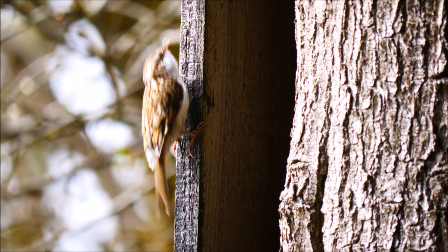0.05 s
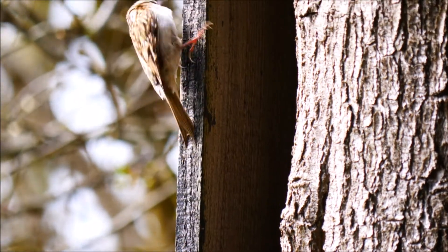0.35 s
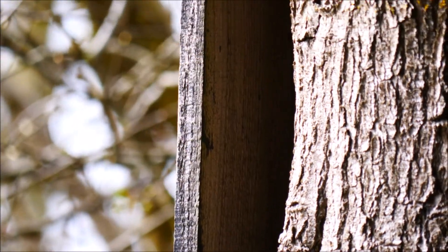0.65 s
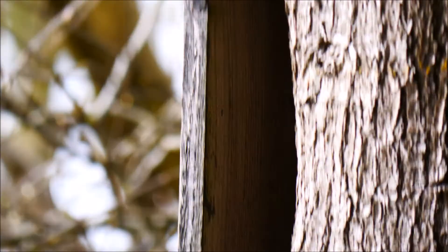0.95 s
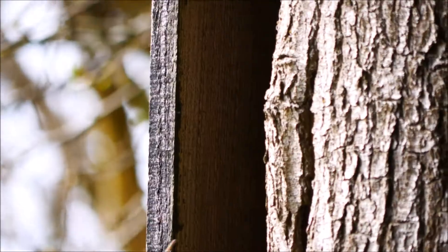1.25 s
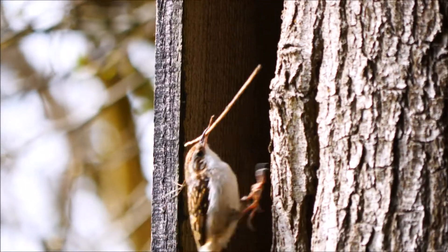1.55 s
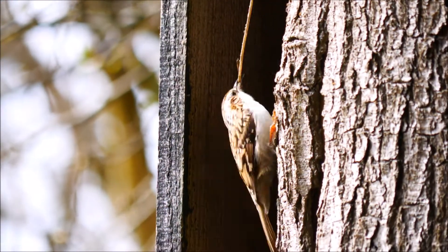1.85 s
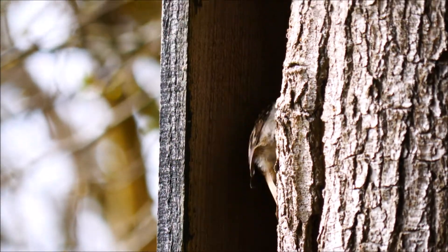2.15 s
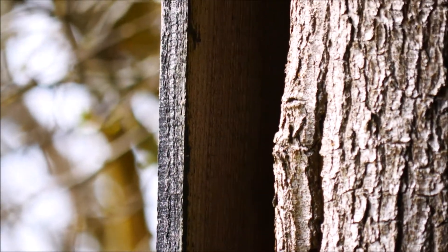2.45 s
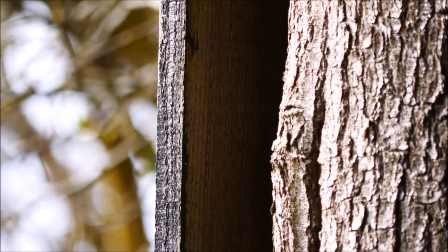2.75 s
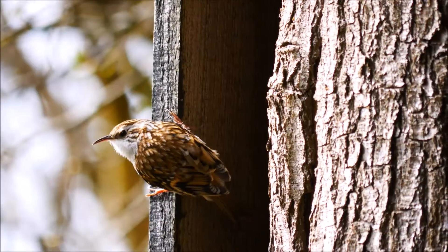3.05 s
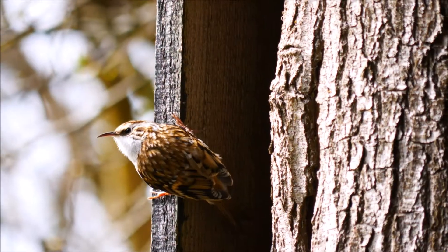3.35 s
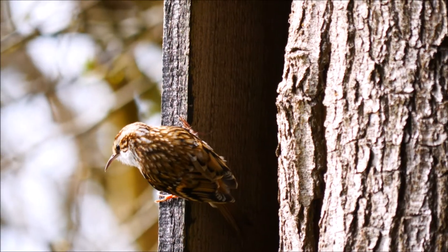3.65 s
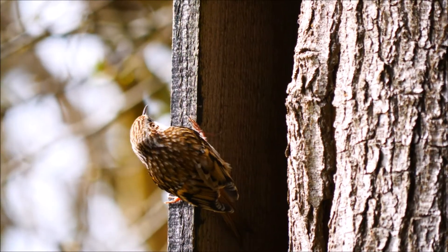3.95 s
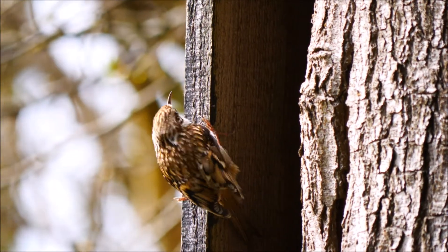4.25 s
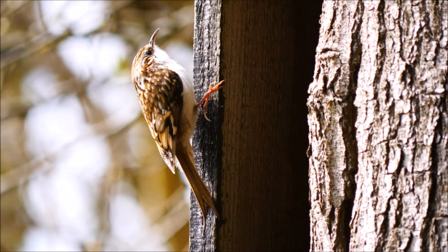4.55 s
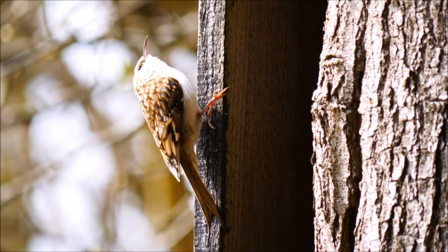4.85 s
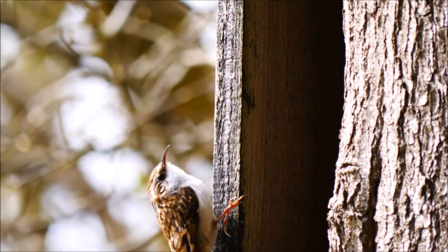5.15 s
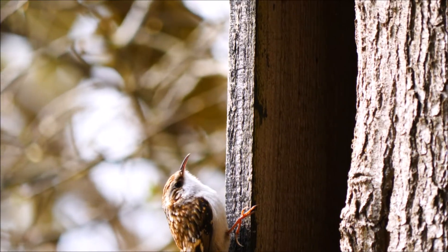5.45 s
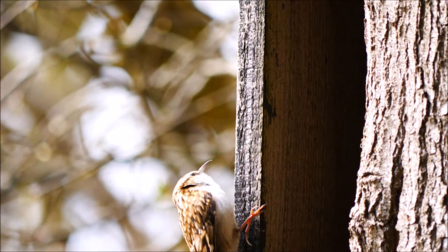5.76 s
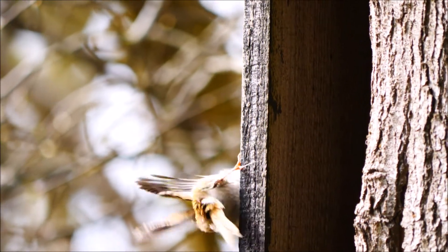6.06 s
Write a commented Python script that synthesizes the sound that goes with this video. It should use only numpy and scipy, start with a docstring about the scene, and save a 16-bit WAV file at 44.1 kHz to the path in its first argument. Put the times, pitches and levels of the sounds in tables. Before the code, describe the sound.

Thin chirps, hoarse whistling calls and light ticks on tree bark over a low, far road roar that cuts out briefly twice.

```python
"""A woodland edge by a barn: distant engines rumble and tyres roar and hum under a thin hiss of leaves.
From the start far birds sing, smeared by the echo of the wood; a near one brushes its feathers on bark.
Hoarse calls, a high pip, a tick of claws and a falling swish lead into a brief dropout at 1.1 s.
Chirps and sharper ticks follow, then a second dropout at 2.9 s; each time the traffic returns changed.
Last come two-tone calls and the loudest hoarse calls, as the rumble swells a little."""
import sys
import numpy as np
from scipy import signal
from scipy.fft import rfft, irfft, next_fast_len
from scipy.io import wavfile
from scipy.ndimage import uniform_filter1d, map_coordinates

SR = 44100
rng = np.random.default_rng(int(sys.argv[2]) if len(sys.argv) > 2 else 0)


def bounce(signal):
    """Save signal as a 16-bit WAV file at the path given by the first command-line argument."""
    frames = np.transpose(np.atleast_2d(signal))
    limited = np.clip(frames, -1, 1)
    pcm = np.round(limited * 32767).astype(np.int16)
    wavfile.write(sys.argv[1], SR, pcm)


N = 278271
TIME = np.arange(N) / SR
LONG_T60, SHORT_T60 = 0.55, 0.48  # how long the wood rings after a call [s]


def amp(db):
    """Decibels to gain."""
    return 10 ** (np.asarray(db) / 20)


def unit(x):
    """Scale to rms 1."""
    return x / np.sqrt(np.mean(x ** 2) + 1e-20)


def along(points, hz):
    """Read (frequency, value) points on a log axis."""
    f, v = np.transpose(points)
    return np.interp(np.log(hz + 1), np.log(f + 1), v)


def arch(t, length):
    """A smooth rise and fall that lasts length seconds."""
    return np.sin(np.pi * np.clip(t / length, 0, 1))


def wobble(rate):
    """A smooth random curve, rate knots a second."""
    return map_coordinates(rng.standard_normal(256), [TIME * rate], mode="mirror")


def filtered(x, response):
    """EQ x with a gain given as a function of frequency."""
    n = x.shape[-1]
    m = next_fast_len(n + 8192)
    return irfft(rfft(x, m) * response(np.fft.rfftfreq(m, 1 / SR)), m)[..., :n]


def add(out, start, x):
    """Mix a stereo sound in at start seconds."""
    part = out[:, max(round(start * SR), 0):][:, :x.shape[-1]]
    part += x[..., :part.shape[-1]]


# stereo image of the noise beds: (frequency [Hz], left-right correlation [0 to 1])
STEREO_IMAGE = [(25, .85), (45, 0.67), (70, 0.99), (130, 1), (250, 1), (500, 0.98), (1000, 0.87),
                (2000, 0.66), (4000, 0.5), (8000, 0.52), (12000, .45)]


def noise_bed(spectrum, patchy_db):
    """Stereo noise of rms 1 with fleeting narrow patches, near mono in the bass, wider in the treble."""
    bins = signal.stft(rng.standard_normal((2, N)), nperseg=2048)[2]
    patches = uniform_filter1d(rng.standard_normal(bins.shape[1:]), size=4, axis=0)
    patches = unit(uniform_filter1d(patches, size=3, axis=1))
    pair = signal.istft(bins * amp(patchy_db * patches), nperseg=2048)[1][:, :N]
    width = lambda hz: np.arccos(np.clip(along(STEREO_IMAGE, hz), 0, 1)) / 2
    eq = lambda hz: amp(along(spectrum, hz)) * [np.cos(width(hz)), np.sin(width(hz))]
    mid, side = filtered(pair, eq)
    return unit(np.array([mid + side, mid - side]))


# background mix before, between and after the dropouts: (rumble [dB], roar [dB], roar swell [dB/s],
# roar tilt about 1 kHz [dB], tilt drift [dB/s], bass EQ [dB], low-mid EQ [dB],
# leaves [dB], leaf swell [dB/s])
BED_MIX = [(-42, -38, -1.3, -1, -1.3, -4, 0, -57, 0), (-43.5, -40, 1.1, 0, -0.3, -1, -3, -57.5, 0),
           (-44, -42, 0.73, -1, -0.24, -1, -0.2, -58.5, -0.45)]


def bed_mix():
    """Per sample: the seconds since this stretch of background began, then each of its settings."""
    starts = np.array([0] + [row[1] for row in CUTS])
    index = np.searchsorted(starts[1:], TIME, side="right")
    return [TIME - starts[index], *np.array(BED_MIX)[index].T]


# tone of the engine rumble and of the tyre roar: (frequency [Hz], relative level [dB])
ENGINE_EQ = [(20, -32.5), (45, -28), (65, -20.5), (100, -6.5), (135, -0.5), (175, 1.5), (305, -1.1),
             (400, -7.5), (600, -11.5), (1200, -46)]
TYRE_EQ = [(200, -59), (400, -9), (560, -8), (660, -4.5), (770, -2), (1000, -3.5), (1250, -7.5),
           (1600, -10.5), (2100, -20), (2800, -27.5), (5000, -57), (16000, -71)]
# brief swells and dips in the level of the rumble and roar:
# (time [s], length [s], rumble change [dB], roar change [dB])
TRAFFIC_SWELLS = [(0.606, 0.32, -1, -0.1), (1.5, 0.4, 0.3, 0.5), (4.248, 1.1, 1.5, 0.5), (5.2, 1, 2, 0)]


def traffic(drift_db=-0.9, throb_db=-0.5, left_db=0.12, low_mid_hz=515, low_mid_width_hz=100):
    """Engines rumble far away; the tyre roar swells or ebbs and changes colour as vehicles move."""
    age, rumble_db, roar_db, swell_db, tilt_db, tilt_drift, bass_db, low_mid_db, *_ = bed_mix()
    for start, length, rumble_change_db, roar_change_db in TRAFFIC_SWELLS:
        envelope = arch(TIME - start, length)
        rumble_db = rumble_db + rumble_change_db * envelope
        roar_db = roar_db + roar_change_db * envelope
    tilt_db = tilt_db + tilt_drift * age
    roar = noise_bed(TYRE_EQ, patchy_db=0.97)
    dark = filtered(roar, lambda hz: 1 / (1 + (hz / 1000) ** 4))
    roar = dark * amp(-tilt_db / 2) + (roar - dark) * amp(tilt_db / 2)
    rumble = noise_bed(ENGINE_EQ, patchy_db=1.76)
    bass = filtered(rumble, lambda hz: 1 / (1 + (hz / 120) ** 4))
    engines = amp(rumble_db + throb_db * wobble(4.3)) * (rumble + (amp(bass_db) - 1) * bass)
    road = engines + amp(roar_db + swell_db * age + drift_db * wobble(4.04)) * roar
    low_mids = filtered(road, lambda hz: np.exp(-((hz - low_mid_hz) / low_mid_width_hz) ** 2))
    return (road + (amp(low_mid_db) - 1) * low_mids) * amp([[left_db], [-left_db]])


# tyres singing above the roar: (time [s], length [s], start pitch [Hz], drift [Hz/s], level [dB])
TREAD_HUMS = [(-.2, 1.6, 1206, -10, -49), (0.407, 1.1, 751, -16.5, -53), (0.601, 0.7, 1805, -31.5, -58),
              (1.5, 0.73, 1395, 0, -52), (1.7, 0.6, 864, -51.5, -45.5), (2.204, .6, 745, -10.5, -52.5),
              (2.204, 0.92, 1094, -10, -53.5), (3.3, 2.2, 814, -20.5, -57.5), (5.2, 1.7, 810, -34.5, -48),
              (5.3, 0.8, 902, 0, -51)]


def tread_hum(width_hz=72):
    """Each vehicle's tread sings a narrow band of noise that swells and fades; most sink in pitch."""
    out = np.zeros((2, N))
    band = [(0, 0), (width_hz / 3, 0), (width_hz, -15), (4 * width_hz, -80)]
    to_stereo = np.array([[1, .3], [1, -.3]])
    for start, length, hz, drift, db in TREAD_HUMS:
        phase = 2 * np.pi * np.cumsum(hz + drift * (TIME - start)) / SR
        a, b = filtered(rng.standard_normal((2, 2, N)), lambda f: amp(along(band, f)))
        hum = a * np.cos(phase) + b * np.sin(phase)  # slow noise shifted up to the pitch
        out += amp(db) * arch(TIME - start, length) * unit(to_stereo @ hum)
    return out


# tone of the moving air: (frequency [Hz], relative level [dB])
DRAUGHT_EQ = [(15, -7), (45, -1), (90, -12.5), (200, -36), (600, -75.5)]


def draught(db=-83):
    """A trace of moving air at each microphone port, unrelated from left to right."""
    air = filtered(rng.standard_normal((2, N)), lambda hz: amp(along(DRAUGHT_EQ, hz)))
    return amp(db) * unit(air)


# tone of the leaf hiss: (frequency [Hz], relative level [dB])
LEAF_EQ = [(800, -23.5), (2000, 0), (3000, 2), (4400, -2.5), (5500, -8), (7500, -11), (9500, -12),
           (12500, -18.5), (15000, -27.5)]


def leaves(waver_db=1.5):
    """A thin, wavering hiss of air in the trees, easing in the last stretch."""
    age, *_, hiss_db, swell_db = bed_mix()
    return amp(hiss_db + swell_db * age + waver_db * wobble(7)) * noise_bed(LEAF_EQ, patchy_db=2.5)


def woods(x, wet_db, t60, side_db):
    """A short sound and its scatter from many trunks, new for every perch."""
    t = np.arange(SR // 2) / SR
    tails = rng.standard_normal((2, len(t))) * amp(-60 * t / t60)
    tails *= amp(wet_db) / np.linalg.norm(tails[0])
    tails[0, 0] += 1  # the direct path
    mid, side = signal.fftconvolve(x[None], tails, axes=1)
    return np.array([mid + amp(side_db) * side, mid - amp(side_db) * side])


def bird_note(length, start_hz, glide, flutter, wet_db, t60=LONG_T60, warble=0, octave_db=-60, fade=.47):
    """A whistle with a weak octave and its echo; glide, flutter and warble are shares of the pitch."""
    flutter_rate, warble_rate = 330, 21  # per second
    t = np.arange(SR // 5) / SR
    progress = np.clip(t / length, 0, 1)
    shake = map_coordinates(rng.standard_normal(128), [t * flutter_rate], mode="mirror")
    vibrato = warble * np.cos(2 * np.pi * warble_rate * t)
    hz = start_hz * (1 + glide * progress) * (1 + flutter * shake + vibrato)
    envelope = np.sin(np.pi / 2 * np.clip(2 * np.minimum(progress, 1 - progress) / fade, 0, 1))
    phase = 2 * np.pi * np.cumsum(hz) / SR
    tone = np.sin(phase) + amp(octave_db) * np.sin(2 * phase)
    sound = woods(envelope * tone, wet_db, t60, side_db=-7.0)
    return sound * np.sqrt(2 * length * SR / np.sum(sound ** 2))


# phrases of far song: (time [s], length [s], pitch [Hz], level [dB])
PHRASES = [(0.023, 0.56, 4300, -65.5), (0.55, 0.5, 4190, -73), (1.846, 1.24, 4770, -63),
           (3.156, 0.61, 4780, -63.5), (4.797, 0.6, 4600, -68), (5.546, 0.36, 4120, -63)]
# tone of the blur of still farther birds: (frequency [Hz], relative level [dB])
TWITTER_EQ = [(2000, -43.5), (3000, -2.5), (3900, 4.5), (4700, -5), (5100, -6.5), (5600, -33.5),
              (7500, -48)]


def far_song(count=8, note_s=.05, note_db=-3, pitch_spread=.04, glide_spread=.05, floor_db=-76.5):
    """Each phrase is a run of quick random notes over a soft band of twitter that swells with it."""
    out = np.zeros((2, N))
    twitter_gain = amp(floor_db)
    for start, length, hz, db in PHRASES:
        twitter_gain = np.hypot(twitter_gain, amp(db) * arch(TIME - start, length))
        for k, (detune, glide) in enumerate(rng.standard_normal((count, 2))):
            note_hz = hz * (1 + pitch_spread * detune)
            note = bird_note(note_s, note_hz, glide_spread * glide, flutter=.025, wet_db=11.5)
            add(out, start + length * k / count, amp(db + note_db) * note)
    return out + twitter_gain * noise_bed(TWITTER_EQ, patchy_db=4.0)


# strokes of feathers on bark: (time [s], length [s], level [dB])
FEATHER_STROKES = [(.05, 0.49, -71.5), (1.593, 0.23, -72.5), (2.142, .1, -69.5), (2.265, 0.31, -59),
                   (2.48, 0.63, -73), (6.069, .08, -63.5)]
# their airy tone: (frequency [Hz], relative level [dB])
FEATHER_EQ = [(3000, 0.5), (6000, -1), (8000, -2.5), (9500, 0.5), (12300, 2.5), (13500, -7.5), (15500, -12)]


def feathers(floor_db=-86, grain_db=1.2):
    """The soft brush of feathers in a crevice; each stroke swells and fades."""
    strokes = sum(amp(db) * arch(TIME - start, length) for start, length, db in FEATHER_STROKES)
    brush = noise_bed(FEATHER_EQ, patchy_db=1.8)
    return (amp(floor_db) + strokes) * amp(grain_db * wobble(38)) * brush


# rasps that end in a whistle:
# (time [s], length [s], rasp pitch [ratio], rasp level [dB], whistle pitch [Hz], whistle level [dB])
RASPS = [(0.057, 0.11, 1, -62, 4550, -70), (0.367, 0.086, 0.99, -61, 4850, -64),
         (0.964, 0.085, 1.1, -64, 4740, -73), (4.829, 0.099, 1.05, -53.5, 4450, -45),
         (5.088, 0.086, 1.02, -54, 4260, -47)]


def hoarse_calls(high_hz=6400, low_hz=3800, low_db=2.5, octaves=0.29, ceiling_hz=9000, rise=0.064):
    """Noise swells through two broad, climbing resonances, then a warbling whistle falls slightly."""
    whistle_delay_s = .053
    out = np.zeros((2, N))
    t = np.arange(SR // 5) / SR
    hump = lambda hz, peak_hz: np.exp(-.5 * (np.log2((hz + 1) / peak_hz) / octaves) ** 2)
    colour = lambda hz: np.hypot(hump(hz, high_hz), amp(low_db) * hump(hz, low_hz))
    high_cut = lambda hz: 1 / np.hypot(1, (hz / ceiling_hz) ** 20)
    for start, length, pitch, db, whistle_hz, whistle_db in RASPS:
        noise = rng.standard_normal(len(t))
        early, late = (unit(filtered(noise, lambda hz: colour(hz / shift / pitch) * high_cut(hz)))
                       for shift in (1 - rise, 1 + rise))
        rasp = early + (late - early) * np.clip(t / length, 0, 1)
        add(out, start, amp(db) * woods(rasp * arch(t, length), wet_db=1.0, t60=SHORT_T60, side_db=-4.5))
        whistle = bird_note(.92 * length, whistle_hz, glide=-0.018, flutter=.012, wet_db=-2.5,
                            warble=.017, fade=.18)
        add(out, start + whistle_delay_s, amp(whistle_db) * whistle)
    return out


# thin, very high pips: (time [s], level [dB], relative level of the octave [dB])
PIP_CUES = [(.585, -69, -20), (1.76, -71, -6), (2.713, -63, -11)]
# their two voices: (pitch [Hz], trim [dB])
PIP_VOICES = [(6800, 0.5), (8310, -5.5)]


def pips(length=0.039):
    """The same high, sagging pip each time, with a weaker voice above it; its octave glints."""
    out = np.zeros((2, N))
    for start, db, octave_db in PIP_CUES:
        for hz, trim_db in PIP_VOICES:
            pip = bird_note(length, hz, glide=-0.032, flutter=.008, wet_db=-8, octave_db=octave_db)
            add(out, start, amp(db + trim_db) * pip)
    return out


# claws and twig on bark: (time [s], dry peak [dB], ring [Hz], decay by 60 dB [s], resonance [Q])
BARK_HITS = [(.932, -51, 9830, 0.0095, 1.6), (1.664, -47, 9460, 0.036, 0.86),
             (1.752, -40.5, 4400, .005, .8), (2.239, -34, 4450, 0.004, 3.1), (3.086, -52, 9000, .03, 1.2),
             (5.006, -51.5, 11500, .015, 2), (6.09, -57, 9900, .03, 1.3), (6.109, -49.5, 9360, 0.046, 0.91)]


def bark_ticks(crack_db=-25):
    """Dry ticks of claws and twig on bark: a short ring and a faint broad crack."""
    out = np.zeros((2, N))
    t = np.arange(SR // 10) / SR
    for start, db, ring_hz, t60, q in BARK_HITS:
        ring = lambda hz: 1j * hz * ring_hz / (q * (ring_hz ** 2 - hz ** 2) + 1j * hz * ring_hz)
        burst = rng.standard_normal(len(t)) * amp(-60 * t / t60)
        tick = filtered(burst, lambda hz: ring(hz) ** 2 + 1j * amp(crack_db))
        add(out, start, amp(db) * woods(tick / np.abs(tick).max(), wet_db=-10, t60=0.1, side_db=5))
    return out


def swish(start=0.98, length=0.18, start_hz=6400, end_hz=3200, half_width_hz=620, db=-60):
    """A breathy band of noise that swells as it slides down."""
    hz = np.interp(TIME, [start, start + length], [start_hz, end_hz])
    breath = unit(filtered(rng.standard_normal(N), lambda f: np.exp(-.5 * (f / half_width_hz) ** 2)))
    sweep = np.sqrt(2) * np.cos(2 * np.pi * np.cumsum(hz) / SR)
    sound = breath * sweep * arch(TIME - start, length)
    return amp(db) * woods(sound, wet_db=-5, t60=SHORT_T60, side_db=-5)[:, :N]


# short gliding chirps: (time [s], length [s], start pitch [Hz], glide [share of pitch], level [dB],
# flutter [share of pitch], reverb send [dB])
CHIRP_CUES = [(1.536, 0.04, 4580, 0.053, -61, .02, 0), (2.066, 0.04, 4750, 0.035, -57, .014, 0.5),
              (2.162, .02, 3850, .02, -59, 0.027, 2), (2.177, 0.014, 3980, .1, -47, 0.011, -0.5),
              (2.575, 0.063, 3430, .02, -60.5, .012, 1), (2.725, 0.094, 3170, 0.14, -56, 0.037, 3),
              (3.685, .04, 4520, .01, -63, 0.022, 4), (3.897, 0.042, 5240, -.015, -65, .01, 0),
              (3.95, 0.135, 4100, -0.26, -64, .03, -1), (4.671, 0.036, 4170, -.07, -65, .024, 0)]


def chirps():
    """Glides from the trees: the nearer ones clear, the far ones buzzy and lost in echo."""
    out = np.zeros((2, N))
    for start, length, hz, glide, db, flutter, wet_db in CHIRP_CUES:
        chirp = bird_note(length, hz, glide, flutter, wet_db, t60=SHORT_T60, octave_db=-23)
        add(out, start, amp(db) * chirp)
    return out


# calls on two pitches at once: (time [s], length [s], level [dB])
TWO_TONE_CUES = [(3.415, 0.135, -57), (5.707, 0.11, -58), (6.136, 0.099, -72)]
# their two voices: (delay [s], pitch [Hz], trim [dB])
TWO_TONE_VOICES = [(0, 4086, 3), (0.016, 3770, 0.5)]


def two_tone_calls():
    """Two nearly level whistles from one throat; the lower joins late and both end together."""
    out = np.zeros((2, N))
    for start, length, db in TWO_TONE_CUES:
        for delay, hz, trim_db in TWO_TONE_VOICES:
            whistle = bird_note(length - delay, hz, glide=0.0064, flutter=0.0075, wet_db=-2.5)
            add(out, start + delay, amp(db + trim_db) * whistle)
    return out


def scene():
    """A bed of traffic and leaves, calls from the trees, and one bird close up on the bark."""
    bed = traffic() + tread_hum() + draught() + leaves()
    calls = far_song() + hoarse_calls() + two_tone_calls() + chirps() + pips() + swish()
    return bed + calls + bark_ticks() + feathers()


# dropouts of the whole mix: (start [s], end [s], dip on return [dB], recovery time constant [s])
CUTS = [(1.1043, 1.2883, -3, 0.21), (2.874, 3.054, -9, 0.011)]


def record(dry, tail_db=-26, tail_t60=0.081, low_cut_hz=30, top_hz=15400):
    """The mix cuts out twice with a faint tail, returns low and recovers; lows and highs are trimmed."""
    gain = np.ones(N)
    for start, end, dip_db, recovery_s in CUTS:
        gap, after = (TIME >= start) & (TIME < end), TIME >= end
        gain[gap] = amp(tail_db - 60 * (TIME[gap] - start) / tail_t60)
        gain[after] *= amp(dip_db * np.exp(-(TIME[after] - end) / recovery_s))
    return filtered(dry * gain, lambda hz: (hz < top_hz) * hz / np.hypot(hz, low_cut_hz))


dry = scene()
out = record(dry)
bounce(out)
```